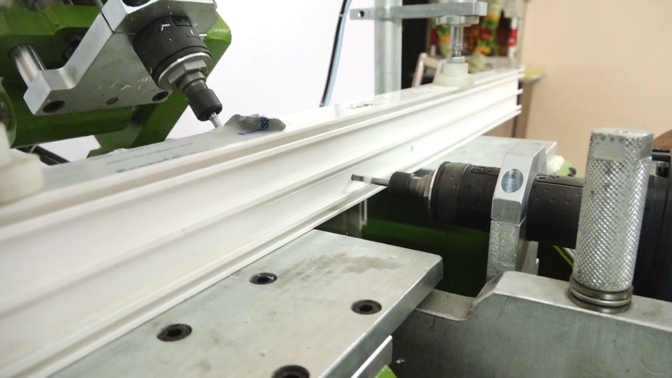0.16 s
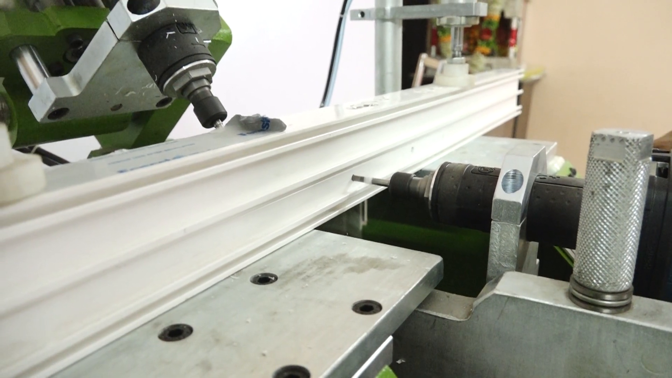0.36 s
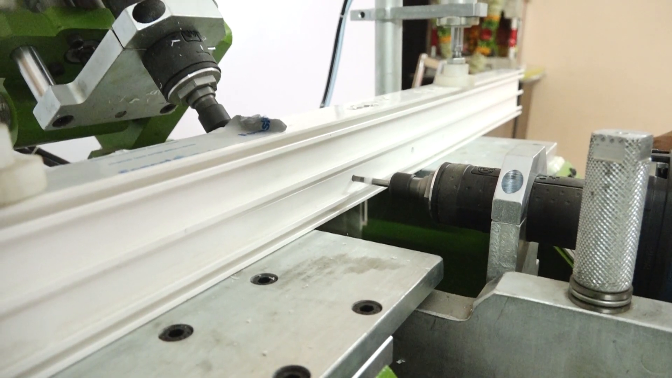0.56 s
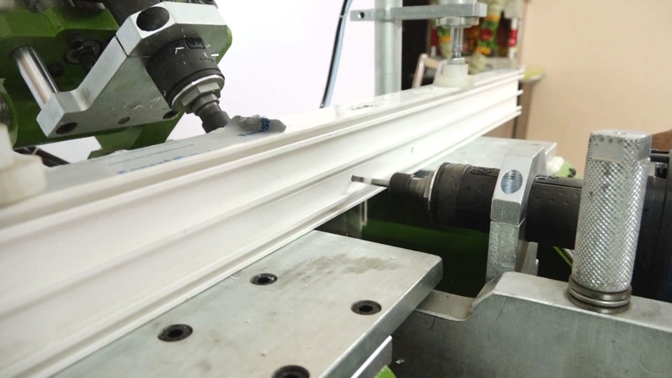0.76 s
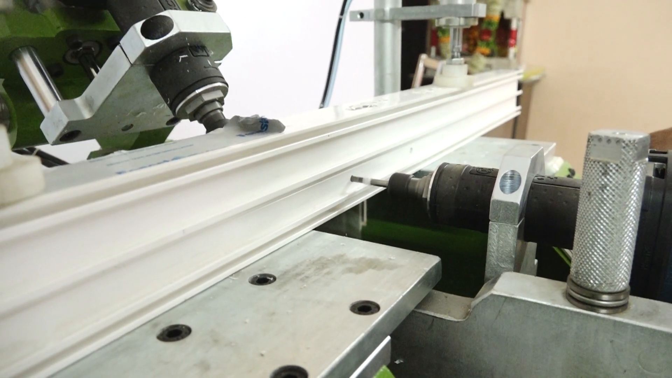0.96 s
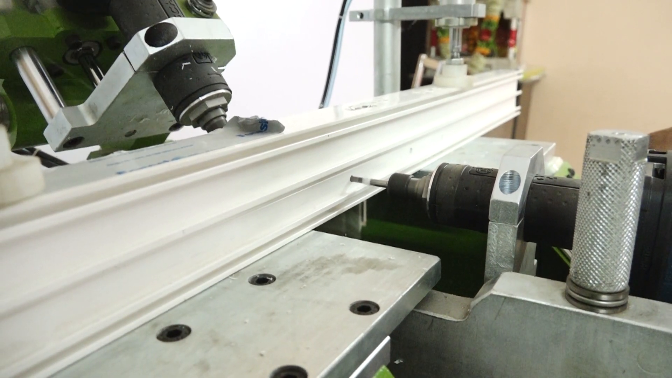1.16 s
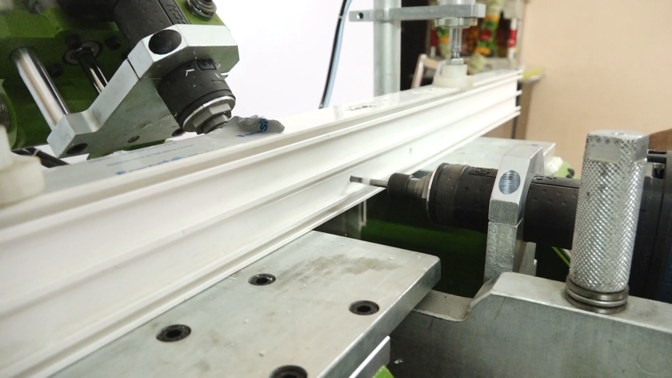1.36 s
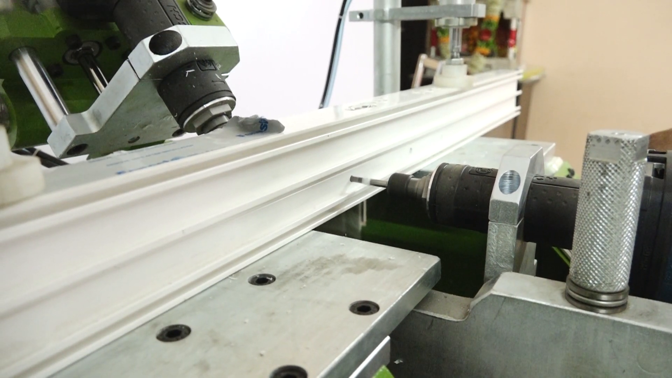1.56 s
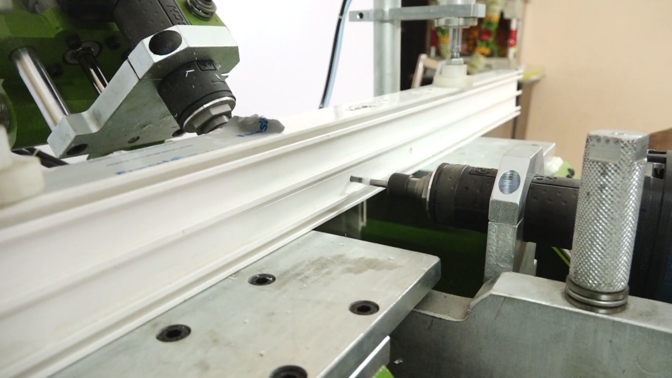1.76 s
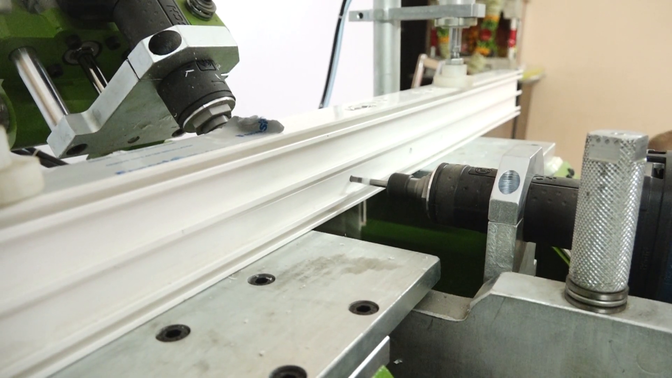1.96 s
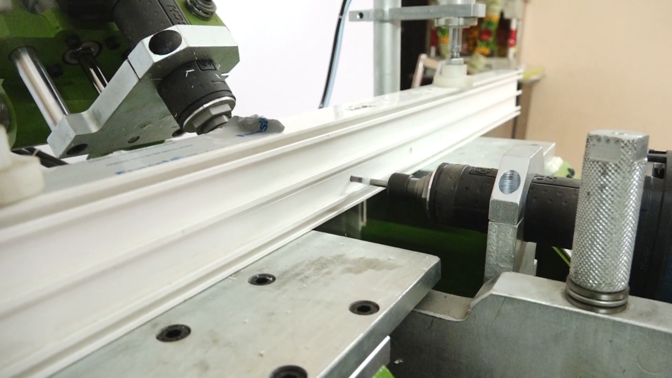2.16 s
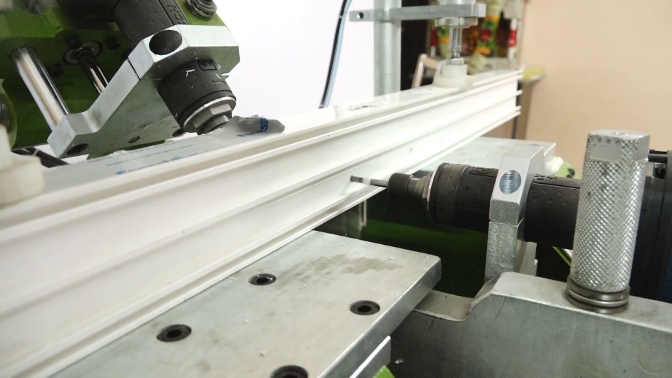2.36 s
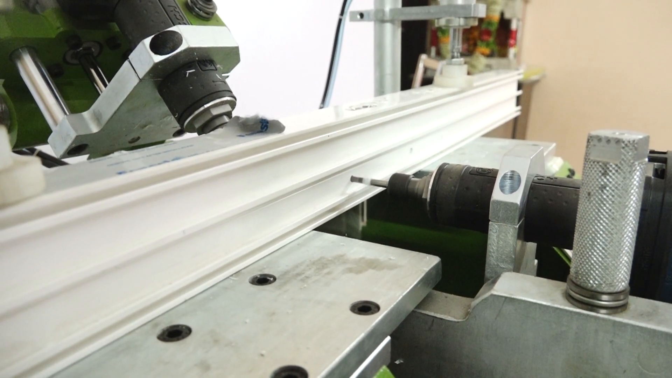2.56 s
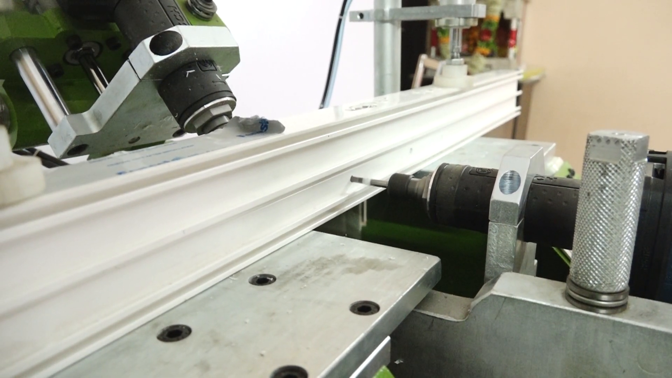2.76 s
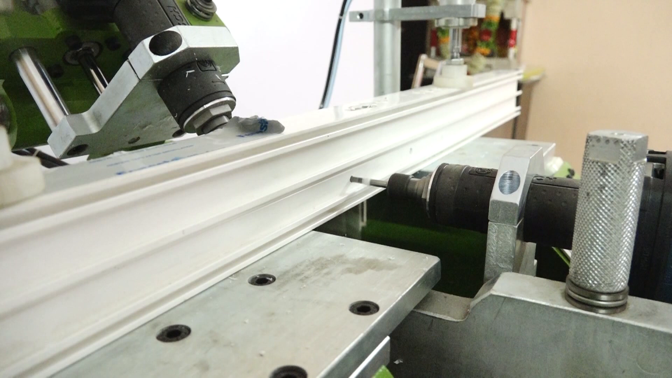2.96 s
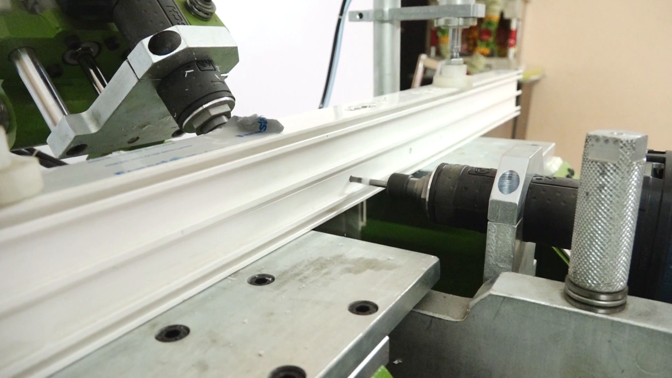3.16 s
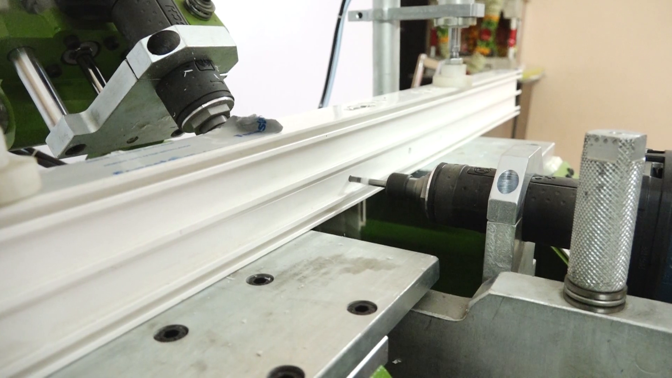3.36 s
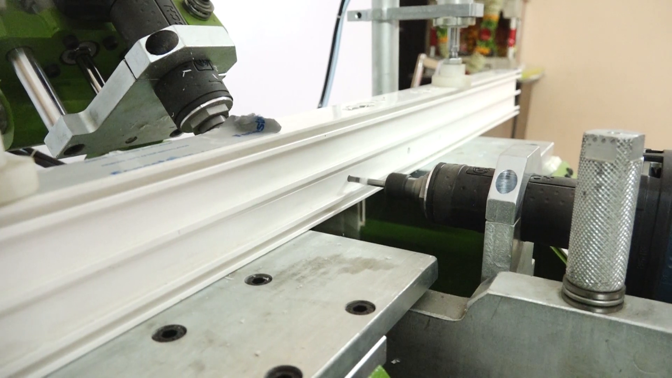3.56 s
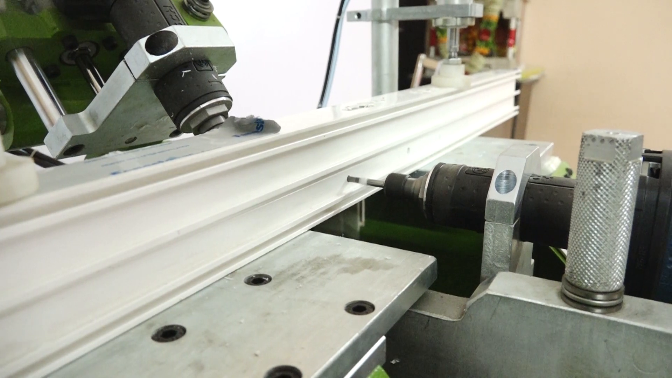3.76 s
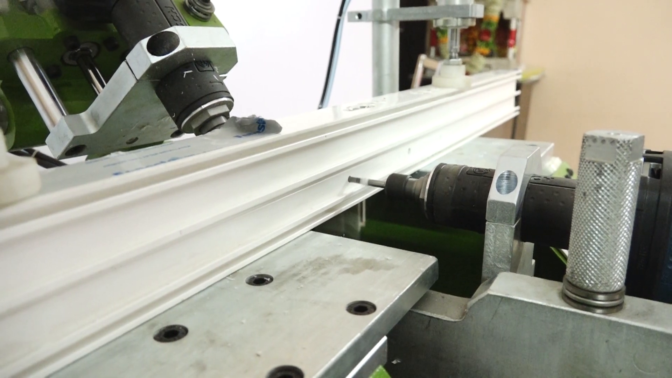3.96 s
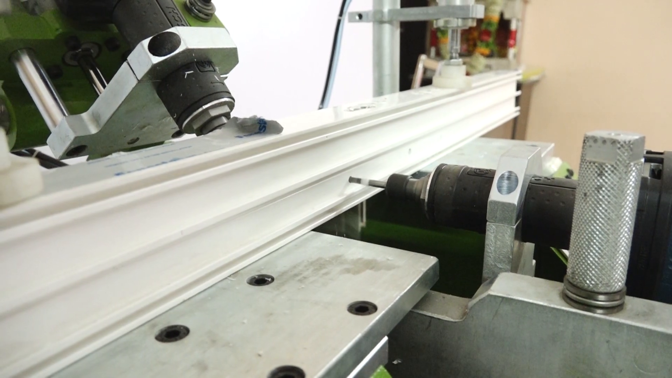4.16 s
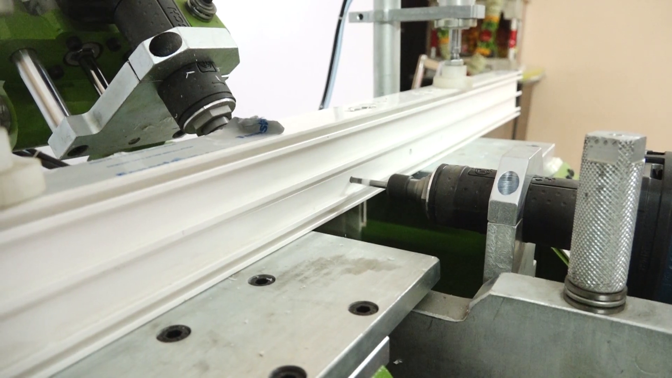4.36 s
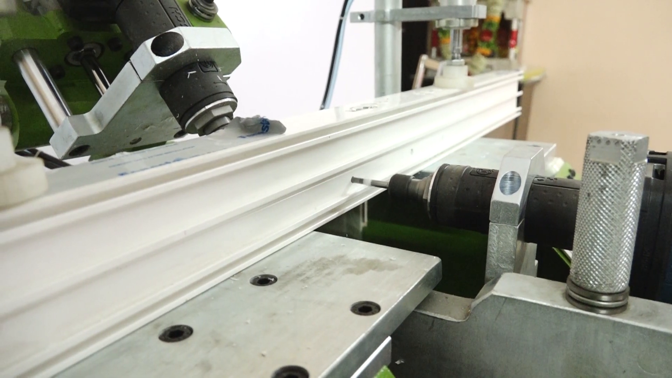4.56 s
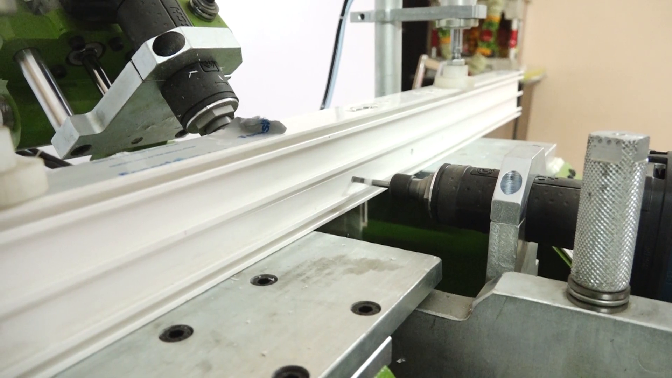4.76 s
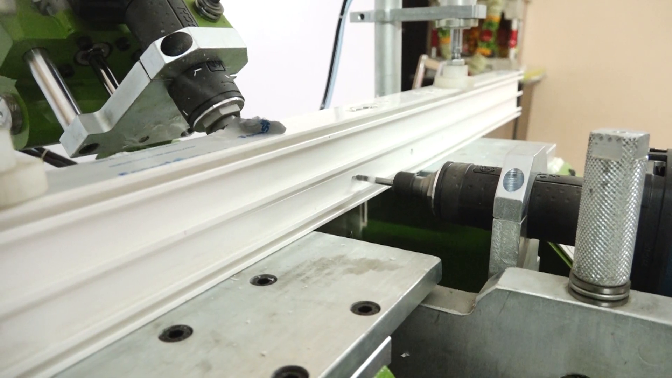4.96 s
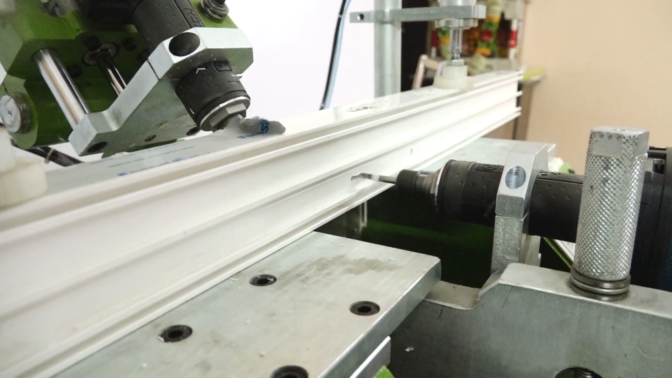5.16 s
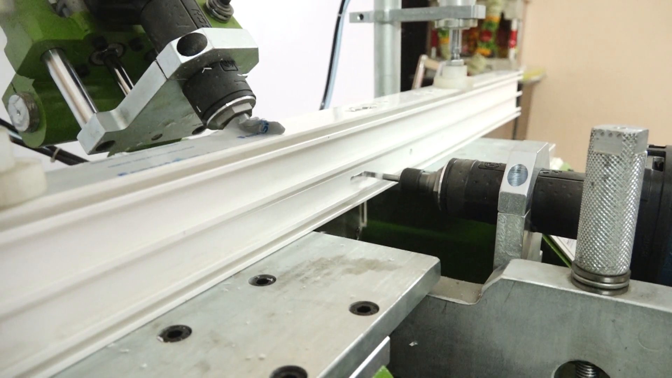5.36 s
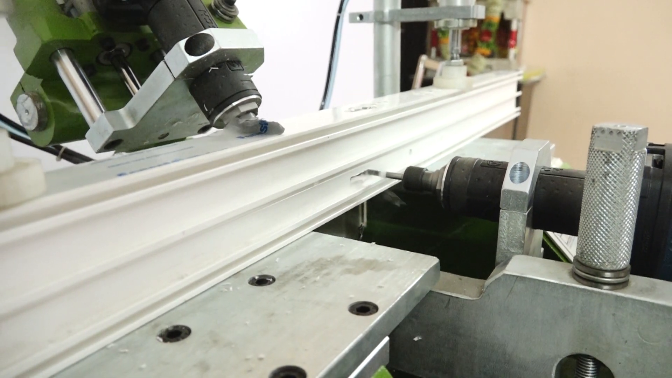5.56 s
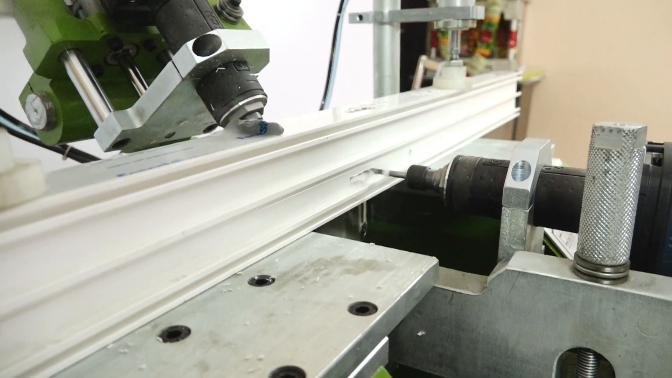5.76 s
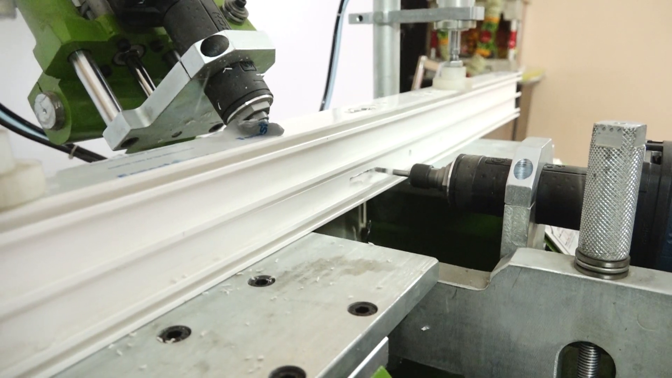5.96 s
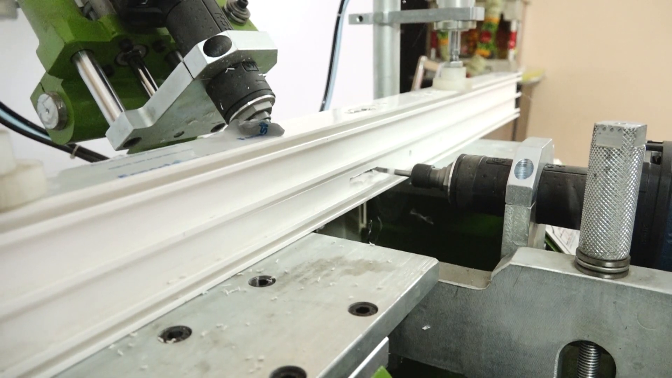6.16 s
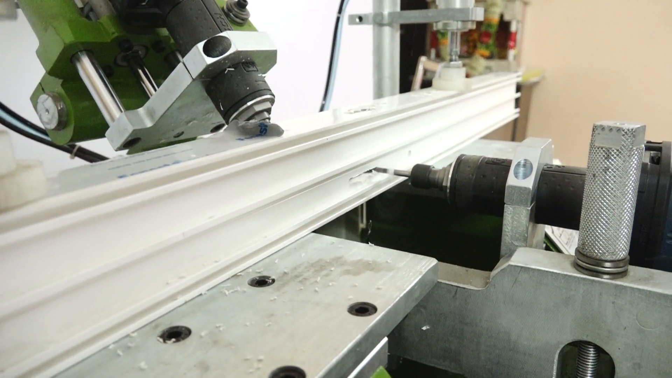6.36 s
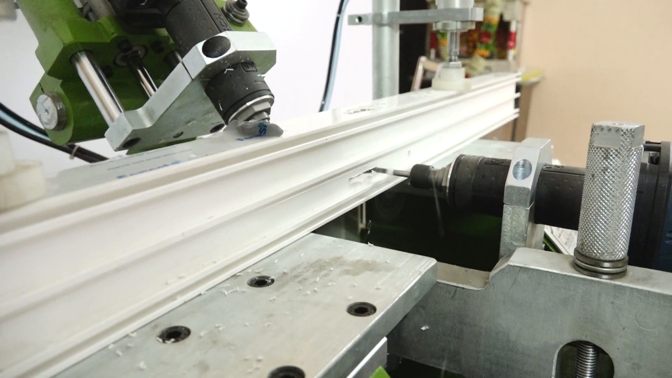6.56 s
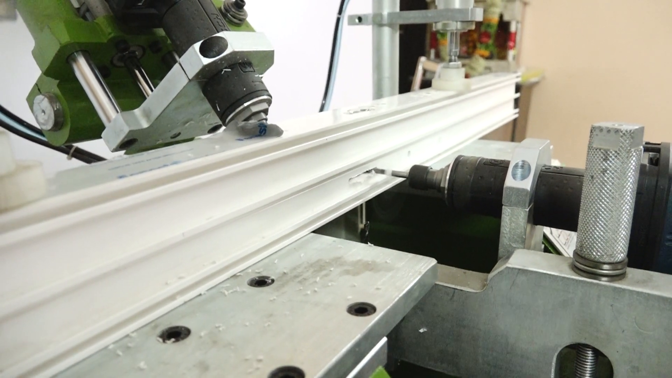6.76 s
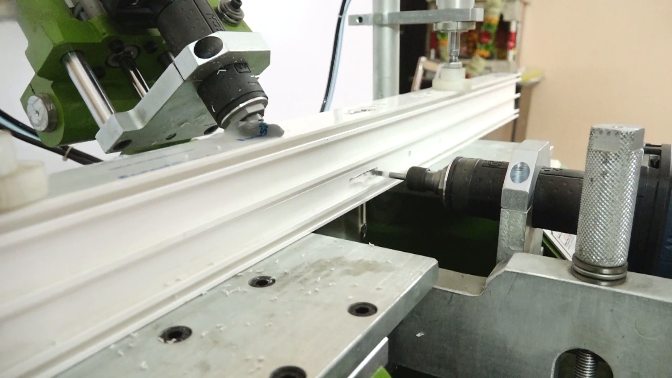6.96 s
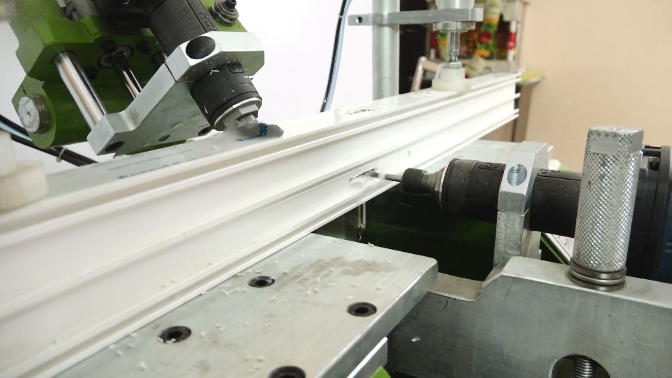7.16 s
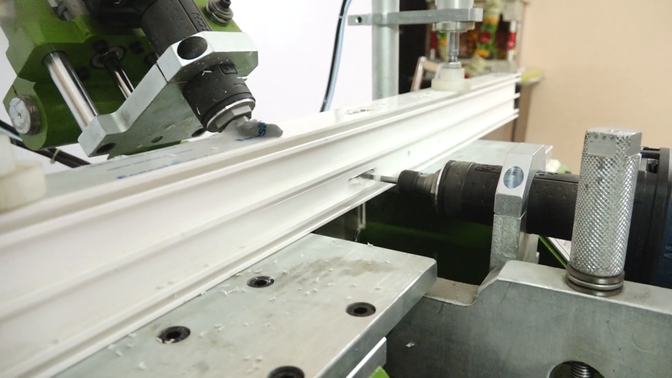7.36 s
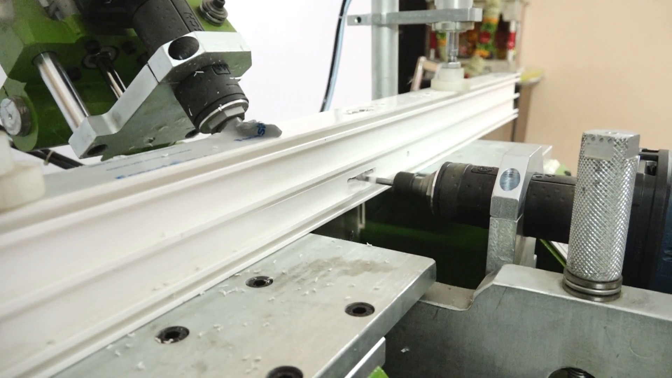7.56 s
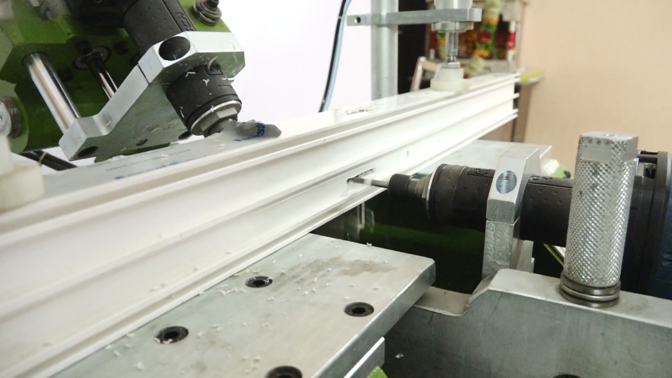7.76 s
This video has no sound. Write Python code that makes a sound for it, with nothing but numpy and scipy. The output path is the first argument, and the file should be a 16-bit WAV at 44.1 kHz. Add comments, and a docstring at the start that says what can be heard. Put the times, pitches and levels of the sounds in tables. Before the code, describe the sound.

Two milling spindles close up in a workshop. One whines steadily while the other quickly runs up to speed over rushing cooling air, grazing the plastic with a short dry hiss near the start. After a long steady whine, both cutters bite hollow plastic, screeching and sagging in pitch with spraying chips. They then speed back up, scrape, and rub with a singing buzz. Close, dry stereo microphone.

```python
"""Two router spindles of a window-profile milling machine, close up in a workshop.
One whines at full speed, a stack of shaft orders, while the other runs up and briefly grazes the bar.
Both bog down as their cutters bite the hollow plastic: tooth blows through the bar's resonances screech
and shriek, and coloured noise makes the chips, dust and rumble.
Past the cut the speeds recover, chips scrape, and the cutters rub and sing in their slots over cooling air."""
import sys
import numpy as np
from scipy import signal
from scipy.fft import rfft, irfft, next_fast_len
from scipy.io import wavfile
from scipy.ndimage import uniform_filter1d, minimum_filter1d

SR = 44100
rng = np.random.default_rng(int(sys.argv[2]) if len(sys.argv) > 2 else 0)


def wav_record(signal):
    """Record a signal, one row per channel, as 16-bit PCM in the file named by sys.argv[1]."""
    frames = np.transpose(np.atleast_2d(signal))
    bounded = np.clip(frames, -1, 1)
    # unit amplitude maps onto the largest positive 16-bit level
    quanta = np.round(bounded * 32767).astype(np.int16)
    wavfile.write(sys.argv[1], SR, quanta)


N = 343539
TIME = np.arange(N) / SR

# spectrum of flying chips: (frequency [Hz], relative level [dB])
CHIP_COLOUR = [(1000, -39), (2500, -31), (3500, 2.5), (5000, 2.5), (7100, -4.5), (9000, -2.5), (11500, -9),
               (14000, -14), (16000, -31)]
# stereo width of the noise of the work: (frequency [Hz], side against mid [dB])
WORK_STEREO = [(60, -29), (200, -12), (700, -2), (2400, -16), (4400, -15), (8100, -8), (15000, -11)]

FREE_HZ, RUN_UP_FROM_HZ = 517.25, 398  # turns per second of the first and second spindle at the start
CUT_START_S, CUT_END_S, CUT_ATTACK_S, CUT_RELEASE_S = 4.81, 6.21, .06, .035
TOUCH_START_S = 6.66  # the cutters begin to rub


def undb(db):
    """Decibels to gain."""
    return 10 ** (np.asarray(db) / 20)


def walk(rate):
    """Smooth random wander of about unit spread, changing about rate times a second."""
    points = rng.standard_normal(int(N / SR * rate) + 2)
    return 1.207 * np.interp(TIME * rate, np.arange(len(points)), points)


def rise(start, attack):
    """A straight rise from silence to one."""
    return np.clip((TIME - start) / attack, 0, 1)


def held(start, end, attack, release):
    """Attack, hold and exponential release."""
    return rise(start, attack) * np.exp(-np.maximum(TIME - end, 0) / release)


def played(events, attack, release):
    """One gain for each level column of a table of held events."""
    return sum(undb(dbs)[:, None] * held(start, end, attack, release) for start, end, *dbs in events)


def bite(db, law):
    """Gain of a sound that lasts as long as the cut: db at 0 dB of bite, law dB more per dB of bite."""
    # how hard the cutters bite, through the wall, on through the hollow, out again: (time [s], level [dB])
    bite_depth = [(4.87, -4.4), (4.98, -1), (5.1, 0.5), (5.3, -1.6), (5.57, -2), (5.66, -4.5), (6.01, -5.5),
                  (6.1, -3), (6.21, -8)]
    depth_db = np.interp(TIME, *np.transpose(bite_depth))
    return undb(db + law * depth_db) * held(CUT_START_S, CUT_END_S, CUT_ATTACK_S, CUT_RELEASE_S)


def colour(points, hz):
    """Gain of a spectrum at the given frequencies."""
    f, db = np.transpose(points)
    return undb(np.interp(np.log(hz + 1), np.log(f), db))


def noise(points, flicker_db, width=WORK_STEREO):
    """Flickering stereo noise, its mid at unit level and its side set by a width spectrum."""
    size = next_fast_len(N)
    hz = np.arange(size // 2 + 1) * SR / size
    mid, side = rfft(rng.standard_normal((2, size))) * colour(points, hz)
    mid = irfft(mid, size)[:N]
    side = irfft(side * colour(width, hz), size)[:N]
    return np.array([mid + side, mid - side]) / mid.std() * undb(flicker_db * walk(40))


def speed(start_hz, loads):
    """Turns per second: after each change of load the rotor settles exponentially to a new speed."""
    hz = np.full(N, float(start_hz))
    for start, settled_hz, lag in loads:
        after = TIME >= start
        hz[after] = settled_hz + (hz[after][0] - settled_hz) * np.exp(-(TIME[after] - start) / lag)
    return hz


def shaft(hz, wander):
    """Shaft angle for a speed that wanders slightly."""
    return 2 * np.pi * np.cumsum(hz * (1 + wander * walk(25))) / SR


def placed(angle, spread=0.11):
    """A partial at the two microphones, reaching one of them a little earlier (spread in radians)."""
    offset = spread * rng.choice([-1, 1]) * np.array([[1], [-1]])
    return np.cos((angle % (2 * np.pi) + offset).astype(np.float32))


def stack(angle, orders, flutter_db, scatter=0., spread=0.097):
    """Shaft orders of unit total level; without phase scatter they add up to one sharp kick a turn."""
    total = 0
    for k, db in orders:
        phase = scatter * rng.standard_normal()
        total = total - undb(db + flutter_db * walk(30)) * placed(k * angle + phase, spread)
    return total / np.sqrt(sum(undb(db) ** 2 for k, db in orders) / 2)


def free_running(angle, hz):
    """The first spindle's whine: a kick each turn, mostly gone once the cut begins, and an imbalance tone."""
    # shaft orders when free: (multiple of the shaft speed, relative level [dB])
    whine_orders = [(1, -37.1), (2, -29), (3, -31), (4, -32.5), (5, -30.5), (6, -34.5), (7, -49), (8, -38),
                    (9, -36), (10, -39.5), (11, -36), (12, -36.5), (13, -33.5), (14, -37), (15, -38.5),
                    (16, -41), (19, -41.9), (22, -42.5)]
    body_db, edge_db, imbalance_db = -25.5, -25.8, -27.2
    left_db, fade_s = -14, .07  # what stays of the kick from the cut on
    mount_hz, mount_width_hz = 440, 52  # the imbalance shakes the mount most near this speed
    low = [o for o in whine_orders if 1.5 < o[0] < 7.5]
    high = [o for o in whine_orders if o[0] > 7.5]
    body = undb(body_db) * stack(angle, low, flutter_db=.6, scatter=.8, spread=.07)
    edge = undb(edge_db) * stack(angle, high, flutter_db=1.2, scatter=.95)
    kick = body + edge * (1 + 0.083 * walk(500))
    fade = np.exp(-np.maximum(TIME - CUT_START_S, 0) / fade_s)
    mount = 1 / np.hypot(1, 2 * (hz - mount_hz) / mount_width_hz)
    imbalance = np.sqrt(2) * mount * undb(imbalance_db + 2.3 * walk(20)) * placed(angle, spread=0.04)
    return np.maximum(fade, undb(left_db)) * kick - imbalance


def second_spindle(angle):
    """Three low orders swell at each contact; the upper ones are blurred when free, clean once it rubs."""
    # low orders swell, mostly as the cutter touches the bar:
    # (start [s], end [s], first order [dB], second order [dB], third order [dB])
    contacts = [(0, .3, -48, -70, -70), (.92, 1.133, -31.5, -24.5, -34), (2.4, 3.598, -40, -70, -70),
                (4.77, 4.91, -29, -25, -22), (4.935, 6.145, -29, -33.5, -35.5),
                (5.77, 5.899, -27, -27, -26), (6.22, 6.95, -33.5, -45, -41), (6.681, 7.8, -47, -24, -26)]
    # upper orders: (multiple, free level before make-up gain [dB], rubbing level before make-up gain [dB])
    upper_orders = [(4, -51, -34.5), (5, -49.5, -35.5), (6, -51.5, -42), (7, -56, -39), (8, -39.5, -33),
                    (9, -45, -34), (11, -41.5, -39), (12, -58, -35), (15, -61, -40), (16, -56, -45)]
    # bearing tones: (multiple, relative level [dB])
    bearing_tones = [(2.41, -36), (3.41, -44), (4.41, -44)]
    free_make_up_db, rub_make_up_db = 2.5, 3
    free_low_db = (-43.5, -50.5, -49.5)  # first three orders running free
    swells = played(contacts, attack=0.095, release=0.052)
    out = 0
    for k, (free_db, touching) in enumerate(zip(free_low_db, swells), 1):
        order = undb(free_db) * placed(k * angle, spread=0.038) + touching * placed(k * angle, spread=0.23)
        out = out + np.sqrt(2) * undb(2.35 * walk(25)) * order
    contact = rise(TOUCH_START_S, attack=0.24)
    blurred = angle + 0.14 * walk(90)
    for k, free_db, rub_db in upper_orders:
        free_gain = undb(free_db + free_make_up_db + 2.3 * walk(60)) * (1 - contact)
        rub_gain = undb(rub_db + rub_make_up_db + 3.6 * walk(22)) * contact
        out += free_gain * placed(k * blurred) + rub_gain * placed(k * angle)
    return out + contact * undb(-40) * stack(blurred, bearing_tones, flutter_db=1.5)


def teeth(angle, hz, orders, rough, flutter_db):
    """Tooth blows of unit level: each order swells as the speed carries it through a resonance of the bar."""
    # resonances of the clamped bar and cutter: (frequency [Hz], width [Hz], relative level [dB])
    bar_modes = [(835, 250, -9), (1135, 170, -2), (1600, 77, 0.5), (2410, 100, -3), (2836, 170, 1.5),
                 (3270, 280, 4.5), (3790, 200, 7), (4400, 390, -2), (4780, 180, 2.5), (5330, 200, -6),
                 (5770, 290, 2.5), (6360, 210, 2.5), (6760, 92, 7.5), (7200, 440, 3.5), (8400, 760, -5),
                 (9000, 570, -5), (11500, 1800, -25), (14900, 1500, -13)]
    grid = np.arange(0, SR / 2, 10)  # one point every 10 Hz
    response = np.sqrt(sum(undb(db) ** 2 / (1 + (2 * (grid - f) / width) ** 2) for f, width, db in bar_modes))
    shaken = angle + rough * walk(220)  # uneven bites jolt the cutter
    total, power = 0, 0
    for k in orders:
        gain = response[np.minimum(k * hz / 10, len(grid) - 1).astype(int)]
        partial = placed(k * shaken + 2 * np.pi * rng.random())
        total = total + gain * undb(flutter_db * walk(55)) * partial
        power = power + gain ** 2 / 2
    return total / np.sqrt(power)


def cutting(angle_a, hz_a, angle_b, hz_b):
    """Both cutters screech in the bar and beat together; the first growls more where the bite is light."""
    upper_a, lower_a, upper_b = np.arange(7, 39), np.arange(2, 7), np.arange(4, 24)  # shaft orders
    screech_law = 1.33  # dB per dB of bite
    beat_depth = .15
    out = bite(-8, screech_law) * teeth(angle_a, hz_a, upper_a, rough=.017, flutter_db=2.1)
    out += bite(-25.5, law=-0.63) * teeth(angle_a, hz_a, lower_a, rough=0.06, flutter_db=1.8)
    out += bite(-12.5, screech_law) * teeth(angle_b, hz_b, upper_b, rough=.022, flutter_db=2.1)
    return out * (1 + beat_depth * np.cos(angle_a - angle_b))


def shrieks(angle_a, angle_b):
    """Single orders swell and die as they catch a resonance; the thin wall rings at its own pitch."""
    # one order locks onto the bar: (start [s], end [s], spindle 1 or 2, multiple, level [dB])
    locked_orders = [(4.814, 4.951, 1, 2, -16), (4.843, 5.02, 1, 9, -16.5), (4.85, 4.96, 1, 14, -14),
                     (4.95, 5.11, 1, 8, -9), (5.1, 5.344, 1, 9, -17), (5.14, 5.3, 1, 12, -13),
                     (5.2, 5.48, 2, 6, -25), (5.274, 5.446, 2, 12, -15), (5.225, 5.698, 1, 13, -9),
                     (5.45, 5.8, 1, 4, -20.5), (5.66, 5.8, 1, 13, -21), (5.737, 6.02, 1, 2, -28),
                     (5.7, 6.18, 1, 6, -24), (5.76, 6.155, 1, 3, -21), (6.06, 6.16, 1, 12, -20),
                     (6.08, 6.24, 1, 9, -25), (6.079, 6.229, 2, 7, -19), (6.13, 6.25, 1, 7, -23),
                     (6.096, 6.243, 1, 8, -18), (6.68, 7.02, 1, 10, -25), (6.66, 6.949, 2, 3, -37),
                     (7.1, 7.48, 2, 3, -23), (7.32, 7.92, 1, 11, -23), (7.66, 7.95, 2, 2, -17)]
    wall_hz, wall_event = 2890, (4.98, 5.15, -15.5)  # the cutter breaks in (start s, end s, dB)
    wall = np.sqrt(2) * placed(2 * np.pi * wall_hz * TIME + .6 * walk(55))
    out = played([wall_event], attack=0.13, release=0.011) * wall
    for start, end, spindle, k, db in locked_orders:
        swell = np.sin(np.pi * rise(start, end - start))
        angle = angle_a if spindle == 1 else angle_b
        partial = placed(k * angle + 0.36 * walk(150))
        out += np.sqrt(2) * undb(db + 1.9 * walk(70)) * swell * partial
    return out


def rubbing(angle):
    """The first cutter rubs in its slot: groups of orders sing, buzz and chatter as each one rises."""
    # shaft orders when rubbing: (multiple, relative level [dB])
    rub_orders = [(1, -34.0), (2, -28), (3, -33), (4, -49), (5, -24), (6, -26.5), (7, -18.5), (8, -22),
                  (9, -23), (10, -29.5), (11, -29.5), (12, -31), (13, -31), (14, -18.5), (15, -27),
                  (16, -29), (17, -26.5), (18, -34.4), (19, -31.5), (20, -38.0), (21, -41), (22, -44),
                  (23, -35), (24, -37), (25, -50.9), (26, -50.1), (27, -51.3), (28, -52.1)]
    # orders that sing at the touch: (multiple, ...)
    touch_multiples = (2, 3, 4, 5, 6, 7, 10, 13)
    # orders that chatter: (multiple, ...)
    chatter_multiples = (11, 12, 14)
    # scrape hiss: (frequency [Hz], relative level [dB])
    scrape_colour = [(1500, -18), (2900, -15), (3600, 1), (4300, 0), (5300, -20), (8000, -24)]
    touch = undb(-18) * rise(TOUCH_START_S, attack=0.073)
    buzz = undb(-18) * rise(6.8, attack=0.23)
    chatter = undb(-18.5) * rise(6.6, attack=0.9)
    singing = [o for o in rub_orders if o[0] in touch_multiples]
    chattering = [o for o in rub_orders if o[0] in chatter_multiples]
    # the first order is left out
    buzzing = [o for o in rub_orders[1:] if o not in singing + chattering]
    out = touch * stack(angle, singing, flutter_db=1.4, scatter=np.pi)
    out += buzz * stack(angle, buzzing, flutter_db=0.5, scatter=np.pi)
    out += chatter * stack(angle, chattering, flutter_db=1.6, scatter=np.pi)
    return out + touch * undb(-10) * noise(scrape_colour, flicker_db=0.5)


def dust(angle_a, angle_b):
    """Gritty dust leaves the cut in puffs, once a turn; a graze gives a short dry hiss."""
    # dust hiss: (frequency [Hz], relative level [dB])
    dust_colour = [(5000, -14), (9000, 3), (12000, 0), (14500, -3), (16000, -13)]
    graze_event = (.95, 1.05, -23)  # the second cutter's first touch (start s, end s, dB)
    puffs = undb(2.4 * walk(1200)) * (1 + 0.25 * np.cos(angle_a))
    out = bite(-17.5, law=3) * puffs * noise(dust_colour, flicker_db=1.1)
    graze = played([graze_event], attack=.06, release=0.08) * (1 + .4 * np.cos(angle_b))
    return out + graze * noise(CHIP_COLOUR, flicker_db=4.0)


def air_and_chips(angle, hz):
    """Cooling air follows the speed; cutting and scraping shake the bed, and the cut throws pulsing chips."""
    # chips scraped along the slots:
    # (start [s], end [s], bed rumble [dB], hollow roar [dB], chip spray [dB])
    scrapes = [(6.29, 6.68, -44, -30, -25), (6.7, 7.12, -52, -37, -34), (7.14, 7.8, -42, -34.5, -37)]
    # spectra of cooling air, bed rumble and hollow roar: (frequency [Hz], relative level [dB])
    air_colour = [(20, -15), (65, -14.5), (200, -20.5), (330, -15.5), (650, -10), (1400, -7), (1900, -9.5),
                  (2750, -6.5), (3500, -1.5), (5800, 0), (7600, -2), (9000, -1), (13000, -8.5),
                  (16000, -12)]
    rumble_colour = [(20, -4), (60, -1), (130, -6), (230, -10), (600, -14), (1500, -42)]
    roar_colour = [(100, -43), (350, -5), (700, -6), (1050, -2.5), (1400, 0), (2000, -3), (3000, 1),
                   (6000, -21)]
    # stereo width of the air: (frequency [Hz], side against mid [dB])
    air_stereo = [(100, -50), (380, -26), (1300, -29), (2400, -86), (4400, -55), (8100, -8.5),
                  (15000, -0.5)]
    air_db, air_law = -22, 1.3  # level at FREE_HZ; power of the speed
    spray_pulsing = 0.47  # depth of the once-a-turn pulse in the thrown chips
    rumble, roar, spray = played(scrapes, attack=0.051, release=0.027)
    air = undb(air_db) * (hz / FREE_HZ) ** air_law * (1 + 0.1 * np.cos(angle))
    thrown = bite(-12, law=2) * (1 + spray_pulsing * np.cos(angle))
    out = air * noise(air_colour, flicker_db=0.7, width=air_stereo)
    out += (rumble + bite(-24, law=4)) * noise(rumble_colour, flicker_db=2.0)
    out += (roar + bite(-17.5, law=1.5)) * noise(roar_colour, flicker_db=1.3)
    return out + (spray + thrown) * noise(CHIP_COLOUR, flicker_db=0.7)


def scene():
    """Both spindles and the noise of their work."""
    # changes of load on the first spindle: (time [s], speed it settles towards [Hz], lag [s])
    loads_a = [(4.8, 450, .3), (4.905, 393, .28), (6.15, 517, .405), (6.69, 490, .1)]
    # second spindle: run-up, graze, recovery, creep, two stages of the cut, release:
    # (time [s], speed it settles towards [Hz], lag [s])
    loads_b = [(0, 516, .38), (1.04, 480, .12), (1.2, 521, .36), (2.2, 534, 1.5), (4.8, 470, .42),
               (5.2, 447, .38), (6.12, 509, .31)]
    hz_a, hz_b = speed(FREE_HZ, loads_a), speed(RUN_UP_FROM_HZ, loads_b)
    wander_a = np.where(TIME < CUT_START_S, 0.0003006, .001)  # share of the speed
    angle_a, angle_b = shaft(hz_a, wander_a), shaft(hz_b, wander=0.00112)
    motors = free_running(angle_a, hz_a) + second_spindle(angle_b) + rubbing(angle_a)
    cut = cutting(angle_a, hz_a, angle_b, hz_b) + shrieks(angle_a, angle_b)
    return motors + cut + dust(angle_a, angle_b) + air_and_chips(angle_a, (hz_a + hz_b) / 2)


def record(dry):
    """A fast limiter holds down the peaks; a steep low-pass cuts off the top."""
    ceiling, top_hz = .78, 15950
    gain = np.minimum(1, ceiling / (np.abs(dry).max(axis=0) + 1e-9))
    gain = uniform_filter1d(minimum_filter1d(gain, size=21), size=21)
    low_pass = signal.firwin(801, top_hz, window="blackman", fs=SR)
    return signal.fftconvolve(dry * gain, low_pass[None], mode="same")


dry = scene()
out = record(dry)
wav_record(out)
```